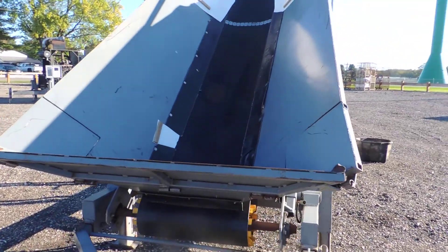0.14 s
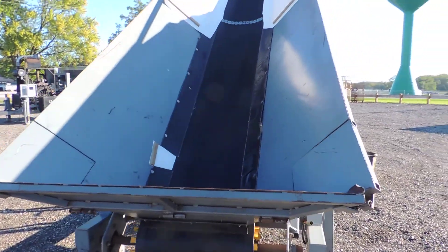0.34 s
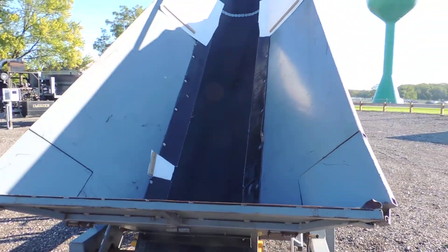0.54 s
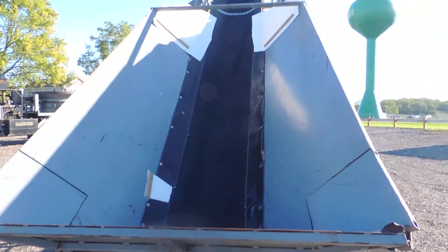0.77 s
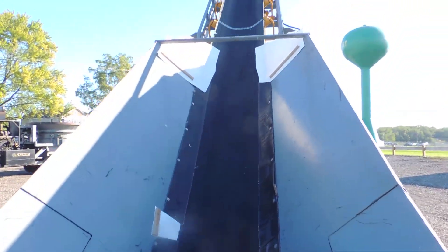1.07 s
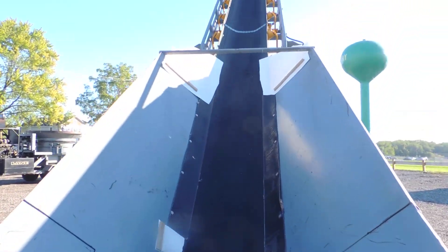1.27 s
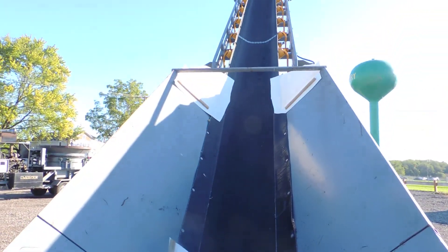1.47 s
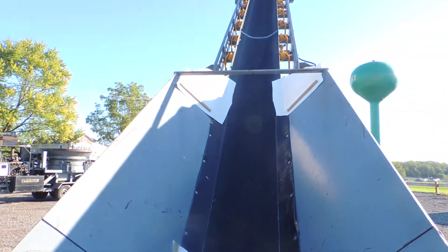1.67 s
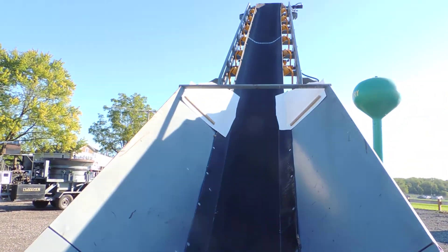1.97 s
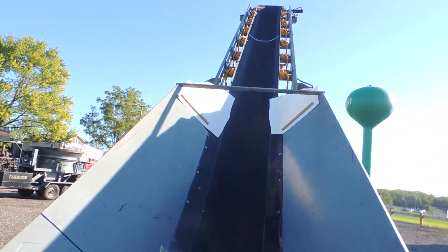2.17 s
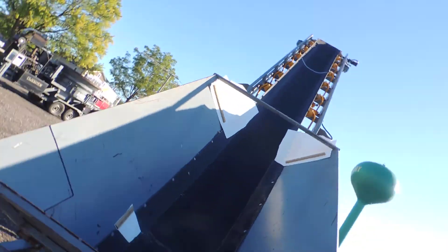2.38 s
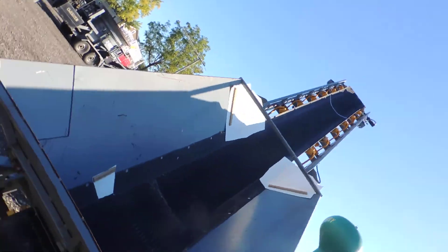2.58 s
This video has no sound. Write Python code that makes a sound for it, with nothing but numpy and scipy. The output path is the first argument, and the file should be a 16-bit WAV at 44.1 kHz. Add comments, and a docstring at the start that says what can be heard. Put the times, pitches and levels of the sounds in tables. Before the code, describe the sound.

A conveyor belt runs with a throbbing engine rumble and regular sharp metallic clacks outdoors

```python
"""An engine throbs and whines as it drives an empty belt conveyor beside a steel hopper on a gravel lot.
Engine: harmonics of one cycle rate. Hopper boom, belt rumble, rattle and hiss: coloured noise.
About twice a second a metal belt joint clacks: a noise burst, a shake and clusters of ringing partials.
Grit crackles faintly as short noise ticks; now and then a gritty scrape or a hollow roller groan
swells and fades. The whole leans a little to the left."""
import sys
import numpy as np
from scipy import signal
from scipy.fft import rfft, irfft, next_fast_len
from scipy.io import wavfile

SR = 44100
rng = np.random.default_rng(int(sys.argv[2]) if len(sys.argv) > 2 else 0)


def int16_out(signal):
    """Quantize to a 16-bit WAV file."""
    q = np.round(np.clip(np.atleast_2d(signal).T, -1, 1) * 32767)
    wavfile.write(sys.argv[1], SR, q.astype(np.int16))


N = 120393
T = np.arange(N) / SR
EDGE_HZ = 14300  # upper edge of the whole sound


def amp(db):
    """Decibels to gain."""
    return 10 ** (np.asarray(db) / 20)


def unit(x):
    """Scales to rms 1."""
    return x / np.sqrt(np.mean(x ** 2) + 1e-20)


def read(points, hz):
    """Reads a curve of (frequency, value) points on a log-frequency axis."""
    point_hz, value = np.transpose(points)
    return np.interp(np.log(hz + 1), np.log(point_hz + 1), value)


def level(points):
    """A level curve as a gain of rms 1, so only its shape counts."""
    return unit(amp(np.interp(T, *np.transpose(points))))


def add(mix, s, sound):
    """Mixes a stereo sound in at time s, trimmed to fit."""
    at = round(s * SR)
    sound = sound[:, max(-at, 0):]
    part = mix[:, max(at, 0):][:, :sound.shape[1]]
    part += sound[:, :part.shape[1]]


def drift(rate_hz):
    """Random motion of rms 1, mostly slower than rate_hz."""
    control_hz, size = 256, 1024
    hz = np.fft.rfftfreq(size, 1 / control_hz)
    spectrum = rfft(rng.standard_normal(size)) / (1 + (hz / rate_hz) ** 2)
    return unit(np.interp(T * control_hz, np.arange(size), irfft(spectrum)))


def noise(spectrum, likeness, size):
    """Coloured stereo noise of rms 1 whose channels are partly alike."""
    n = next_fast_len(size)
    hz = np.fft.rfftfreq(n, 1 / SR)
    left, other = rfft(rng.standard_normal((2, n)))
    alike = np.clip(read(likeness, hz), -1, 1)
    right = alike * left + np.sqrt(1 - alike ** 2) * other
    coloured = np.array([left, right]) * amp(read(spectrum, hz))
    return unit(irfft(coloured, n)[:, :size])


def arch(length_s):
    """A half-sine swell and fade."""
    return np.sin(np.linspace(0, np.pi, round(length_s * SR)))


CYCLE_HZ, BEAT_S = 28.95, 1.5006  # engine cycles per second; moment of one exhaust beat
WANDER_TURNS = 0.0051  # rms drift of the engine's phase
FIRING_LAG_S = 0.00078  # the firing tones (every third order) trail the rest, which doubles each beat


def orders(table, turns, scatter, flutter_db):
    """Harmonics of the engine cycle that line up into one double beat per cycle.

    scatter smears the alignment (radians per order); flutter_db makes each level wander."""
    out = np.zeros(N)
    for order, db in table:
        lag_turns = FIRING_LAG_S * CYCLE_HZ if order % 3 == 0 else 0
        phase = 2 * np.pi * (turns - lag_turns) + scatter * rng.standard_normal()
        out -= amp(db + flutter_db * drift(1.6)) * np.cos(order * phase)
    return out


# Engine harmonics, low to high: order (multiple of the engine cycle), relative_level_db
EXHAUST_ORDERS = [(1, -36), (2, -23.5), (3, -26), (5, -24.5), (6, -21)]
DRONE_ORDERS = [(8, -32), (9, -30), (10, -28.5), (11, -26.5), (12, -39.5), (13, -37), (19, -35.5),
                (24, -29), (25, -48), (26, -33)]
WHINE_ORDERS = [(48, -37), (70, -43), (74, -41), (86, -50.5)]
# Loudness of the throb, then of the drone: time_s, relative_level_db
EXHAUST_SWELL = [(0, -20.5), (0.36, -19.5), (0.39, -17.5), (0.77, -17), (2.73, -17.4)]
DRONE_SWELL = [(0, -31.5), (.3, -30), (.38, -27), (.72, -27.5), (.82, -22), (1.17, -21.5), (1.3, -26),
               (1.72, -23.5), (1.9, -20), (2.02, -26), (2.11, -22), (2.73, -24.5)]
EXHAUST_DB, DRONE_DB, WHINE_DB = 1, -1, -0.5  # gains on the order levels
SCATTER, FLUTTER_DB = 0.1568, 1.07  # smear of the upper orders (radians per order); drone unsteadiness


def engine(turns):
    """A clean exhaust throb, a less steady drone above it, and gear whine: sums of engine orders."""
    throb = orders(EXHAUST_ORDERS, turns, scatter=0.022, flutter_db=0.54)
    throb = amp(EXHAUST_DB) * level(EXHAUST_SWELL) * throb
    drone = orders(DRONE_ORDERS, turns, SCATTER, FLUTTER_DB)
    drone = amp(DRONE_DB) * level(DRONE_SWELL) * drone
    whine = amp(WHINE_DB) * orders(WHINE_ORDERS, turns, SCATTER, flutter_db=-3.1)
    return throb + drone + whine


# Stereo width of the noises: frequency_hz, left_right_likeness (1 = same in both channels)
STEREO_LIKENESS = [(100, 0.98), (600, 1), (1300, 0.96), (2600, 0.39), (5500, 0.084), (9000, 0)]
# Colours of the hopper boom and the three belt noises: frequency_hz, relative_density_db (per Hz)
BOOM_COLOUR = [(20, -27), (45, -7.5), (130, -5), (215, 0), (265, -3.5), (325, -2.5), (375, -1.5),
               (440, -19.5), (700, -37.5)]
RUMBLE_COLOUR = [(200, -34), (330, -8.5), (420, -6.5), (540, -3), (640, -1), (860, -1), (1000, -10.5),
                 (1400, -17.5), (3000, -67)]
RATTLE_COLOUR = [(500, -25), (950, -7.5), (1100, -1), (1230, -7), (1420, 0.5), (1750, -4), (2500, -4.5),
                 (3000, -17), (4500, -21)]
HISS_COLOUR = [(1200, -13), (2700, 6.5), (3500, 1), (4100, -0.5), (4600, 1.5), (6500, -0.5), (7600, -1.5),
               (9800, -5.5), (11500, -3.5), (14000, -8)]
# Loudness of the belt's rumble, upper mids and treble: time_s, relative_level_db
RUMBLE_SWELL = [(0, -23.5), (.36, -24.5), (.6, -20.5), (1.1, -19), (1.3, -24), (1.38, -21.5), (1.53, -23),
                (1.66, -20.5), (2.0, -20.5), (2.17, -22), (2.46, -21.5), (2.53, -19.5), (2.73, -22.5)]
RATTLE_SWELL = [(0, -33), (.25, -35), (.42, -32), (.53, -30.5), (.68, -31), (1.2, -30), (1.45, -33),
                (1.62, -32.5), (1.66, -28.5), (1.75, -30), (2.03, -32), (2.1, -29), (2.25, -31.5),
                (2.47, -33.5), (2.53, -28.5), (2.73, -33.5)]
HISS_SWELL = [(0, 4.5), (.25, 1), (.36, 2), (.41, 6.5), (.47, 3), (.54, 6), (.59, 4.5), (.65, 6), (.8, 6.5),
              (.96, 7), (1.05, 3.5), (1.5, 1.5), (2.0, 3), (2.42, 2), (2.73, 4.5)]
BOOM_DB, RUMBLE_DB, RATTLE_DB, HISS_DB = -28.5, -25, -31, -34
RATTLE_FLICKER_DB = 1.76  # rms of the rattle's fast level motion


def belt():
    """The hopper booms with the exhaust's swell; belt and rollers rumble, rattle and hiss as noise."""
    boom = noise(BOOM_COLOUR, STEREO_LIKENESS, N)[0]  # one channel, sent to both sides
    boom = amp(BOOM_DB) * level(EXHAUST_SWELL) * boom
    rumble = amp(RUMBLE_DB) * level(RUMBLE_SWELL) * noise(RUMBLE_COLOUR, STEREO_LIKENESS, N)
    rattle = amp(RATTLE_DB) * level(RATTLE_SWELL) * noise(RATTLE_COLOUR, STEREO_LIKENESS, N)
    rattle = rattle * amp(RATTLE_FLICKER_DB * drift(66))
    hiss = amp(HISS_DB) * level(HISS_SWELL) * noise(HISS_COLOUR, STEREO_LIKENESS, N)
    return boom + rumble + rattle + hiss


# Colour of a stone's tick: frequency_hz, relative_density_db (per Hz)
STONE_COLOUR = [(2000, -2), (4500, -4), (6200, 2), (8500, -4), (14000, -10)]
GRIT_T60_S = 0.0098


def tick():
    """One short dry tick of a stone: bright noise that dies within milliseconds."""
    t = np.arange(1024) / SR
    return noise(STONE_COLOUR, STEREO_LIKENESS, len(t)) * amp(-60 * t / GRIT_T60_S)


# Loudness of the crackle: time_s, relative_level_db
GRIT_SWELL = [(.3, -14), (.4, -3), (.59, -2), (.64, 8.5), (.85, 5), (1.1, -3.5)]
# Larger stones that stand out: start_s, onset_level_db
LARGE_TICKS = [(.390, -19.5), (0.624, -22), (.6525, -22), (.655, -20), (.673, -31), (.7245, -24),
               (0.793, -14.5), (.8285, -21), (.8925, -25), (.9375, -22), (2.155, -21)]
GRIT_DB, GRIT_PER_S, GRIT_SPREAD_DB = -42, 320, 5
TICK_SHAPES = 12


def grit():
    """Tiny stones tick at random, in a crunchy spell early on; a few larger ones stand out."""
    out = np.zeros((2, N))
    for _ in range(TICK_SHAPES):
        falls = rng.random(N) < GRIT_PER_S / TICK_SHAPES / SR
        size = amp(GRIT_SPREAD_DB * np.minimum(rng.exponential(1, N), 4))
        out += signal.oaconvolve((size * falls)[None], tick(), axes=1)[:, :N]
    out = amp(GRIT_DB) * unit(out * level(GRIT_SWELL))
    for s, db in LARGE_TICKS:
        add(out, s, amp(db) * tick())
    return out


# Colour shared by every clack and shake: frequency_hz, relative_density_db (per Hz)
CLACK_COLOUR = [(1200, -28), (2400, -3.5), (3500, 0.5), (4300, -2.5), (5100, -2.5), (5700, -2.5),
                (6700, -3.5), (7500, 0), (8600, -7), (10000, -16), (11100, -5.5), (12200, -15.5),
                (14000, -15)]
BAND_DB, BAND_WIDTH_HZ = 5.5, 380  # lift and width of a clack's two strong bands


def clack_colour(low_hz, high_hz):
    """The spectrum of one clack: each blow lands differently and brings out two bands."""
    hz = np.linspace(CLACK_COLOUR[0][0], EDGE_HZ, num=128)
    bands = sum(np.exp(-((hz - centre) / BAND_WIDTH_HZ) ** 2) for centre in (low_hz, high_hz))
    return np.column_stack([hz, read(CLACK_COLOUR, hz) + BAND_DB * bands])


def cluster(t, hz, db, t60, spread):
    """Eight close partials that beat as they die, a little different in each channel."""
    detune, start, apart = rng.standard_normal((3, 8, 1))
    partials = np.sin(2 * np.pi * (hz * (1 + spread * detune) * t + start))
    sides = np.array([1 + 0.38 * apart[:, 0], 1 - 0.46 * apart[:, 0]])
    return amp(db - 60 * t / t60) * unit(sides @ partials)


# Ringing modes of the steel frame: pitch_hz, relative_level_db, t60_s, spread (share of the pitch)
STEEL_MODES = [(2486, 0.5, .4, .005), (3450, -7.5, 0.35, 0.0082), (4630, -3.5, 0.41, 0.0085),
               (5170, 1, 0.23, 0.021), (7150, 1, 0.14, .008), (7530, 7, 0.15, 0.0103),
               (8350, -1.5, 0.17, 0.0073), (9260, 0, 0.19, .015), (10800, -6, 0.53, 0.025),
               (12150, -3, 0.2, 0.0058)]
# Blows of the belt joint: start_s, clack_db, decay_s (time constant), low_hz, high_hz (strong bands),
# shake_db, ring_db (frame), first_hz, first_db, second_hz, second_db (roller pings)
JOINT_KNOCKS = [(-.02, -21, .003, 3400, 7400, -30, -37, 3370, -39, 7250, -34),
                (0.2862, -15.5, 0.0036, 3140, 7200, -29, -40, 2520, -34, 3200, -43),
                (0.7422, -15, 0.0055, 4320, 7760, -25.5, -36.5, 4970, -31, 5900, -41),
                (1.1971, -11.5, .0042, 6300, 7340, -25, -37.5, 5130, -30.5, 8220, -30),
                (1.6524, -13.5, 0.0047, 3680, 6300, -24, -30.5, 5065, -23.5, 4600, -31.5),
                (2.1099, -11.5, 0.0025, 3800, 7650, -26.5, -34, 7240, -29, 12150, -38),
                (2.5680, -16, 0.0029, 6060, 7900, -24, -38.5, 4890, -30.5, 8060, -34)]
CLACK_RISE_S, CLACK_HOLD_S, CLACK_LIKENESS = 0.0011, 0.0017, 0.87
SHAKE_T60_S, RING_RISE_S, RING_CHANCE_DB = 0.28, 0.0014, 2  # the last: random level of each mode
PING_T60_S, PING_ROUGH_DB, PING_SPREAD = 0.31, 1, .009  # spread as a share of the pitch


def knock(clack_db, decay_s, low_hz, high_hz, shake_db, ring_db, first_hz, first_db, second_hz, second_db):
    """The joint clacks on steel; the frame shakes and rings, and the struck roller pings at two pitches."""
    t = np.arange(SR // 4) / SR
    colour = clack_colour(low_hz, high_hz)
    burst = amp(clack_db) * noise(colour, [(1, CLACK_LIKENESS)], len(t))
    burst = burst * np.exp(-np.maximum(t - CLACK_HOLD_S, 0) / decay_s)
    shake = amp(shake_db - 60 * t / SHAKE_T60_S) * noise(CLACK_COLOUR, STEREO_LIKENESS, len(t))
    frame = np.zeros((2, len(t)))
    for hz, db, t60, spread in STEEL_MODES:
        mode_db = ring_db + db + RING_CHANCE_DB * rng.standard_normal()
        frame += cluster(t, hz, mode_db, t60, spread)
    roller = cluster(t, first_hz, first_db, PING_T60_S, PING_SPREAD)
    roller = roller + cluster(t, second_hz, second_db, PING_T60_S, PING_SPREAD)
    roller = roller * amp(PING_ROUGH_DB * drift(120)[:len(t)])
    clack_rise = np.minimum(t / CLACK_RISE_S, 1)
    ring_rise = np.minimum(t / RING_RISE_S, 1)
    return clack_rise * (burst + shake) + ring_rise * (frame + roller)


# Colour of a scrape: frequency_hz, relative_density_db (per Hz)
SCUFF_COLOUR = [(500, -11), (1000, 7.5), (1650, -0.5), (2500, -5.5), (4500, -12), (14000, -29)]
# Short scrapes: start_s, length_s, level_db
SCRAPES = [(0.38, 0.022, -36), (0.517, 0.03, -25), (2.048, .045, -26.5), (2.148, 0.029, -25.5),
           (2.188, 0.053, -26.5), (2.482, 0.048, -27)]


def scuff(length_s, db):
    """A short gritty scrape: noise that swells and fades with a rough grain."""
    swell = arch(length_s)
    grain = amp(2 * drift(90))[:len(swell)]
    scrape = noise(SCUFF_COLOUR, STEREO_LIKENESS, size=4096)[:, :len(swell)]
    return amp(db) * swell * grain * scrape


# Roller groans: start_s, length_s, pitch_hz, level_db
ROLLER_GROANS = [(.42, 0.3, 727, -26.5), (1.61, 0.093, 840, -29), (2.469, 0.14, 765, -25.5)]
GROAN_WIDTH_HZ = 21  # distance from the pitch at which the resonance is 6 dB down


def groan(length_s, hz, db):
    """A roller drags on the belt: a hollow resonance, narrow-band noise, swells and fades."""
    swell = arch(length_s)
    band = [(hz + k * GROAN_WIDTH_HZ, -6 * k * k) for k in range(-4, 5)]
    return amp(db) * swell * noise(band, STEREO_LIKENESS, N)[:, :len(swell)]


# Lean of the whole mix: frequency_hz, left_minus_right_db
LEAN = [(100, 2.9), (600, 3.1), (1300, 3.8), (2800, 2.1), (6000, 2.2), (10000, 1.2), (13000, 0)]


def scene():
    """Engine, belt, grit, knocks, scuffs and groans, all a little to the left."""
    turns = CYCLE_HZ * (T - BEAT_S) + WANDER_TURNS * drift(2.55)
    mix = engine(turns) + belt() + grit()
    for s, *row in JOINT_KNOCKS:
        add(mix, s, knock(*row))
    for s, *row in SCRAPES:
        add(mix, s, scuff(*row))
    for s, *row in ROLLER_GROANS:
        add(mix, s, groan(*row))
    lean_db = read(LEAN, np.fft.rfftfreq(2 * N, 1 / SR))
    sides = amp(np.array([lean_db, -lean_db]) / 2)
    return irfft(rfft(mix, 2 * N) * sides)[:, :N]


def record(dry):
    """Clips peaks beyond 0.9 of full scale, then cuts everything above the upper edge."""
    limited = np.clip(dry, -.9, .9)
    low_pass = signal.firwin(511, EDGE_HZ, window=("kaiser", 9), fs=SR)
    return signal.oaconvolve(limited, low_pass[None], "same")


dry = scene()
out = record(dry)
int16_out(out)
```